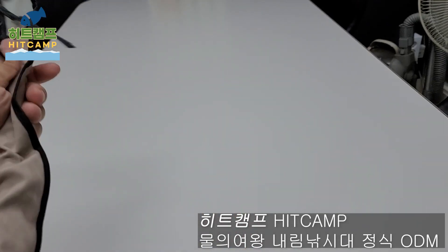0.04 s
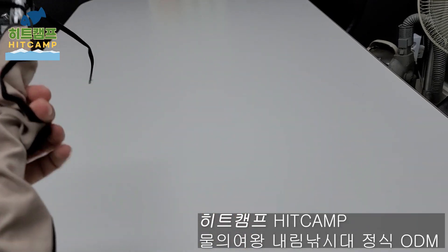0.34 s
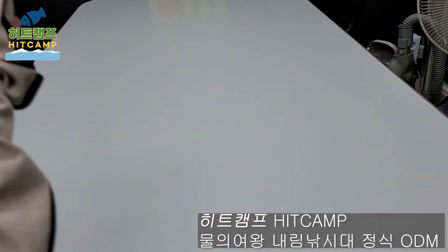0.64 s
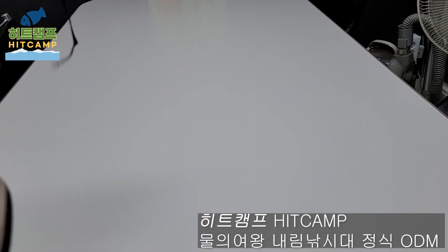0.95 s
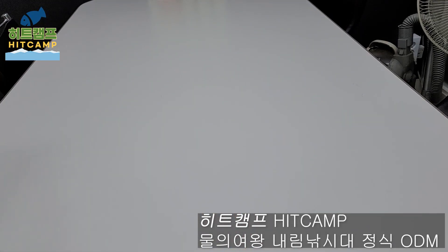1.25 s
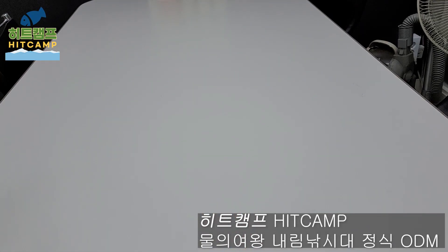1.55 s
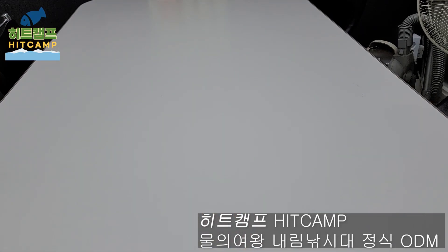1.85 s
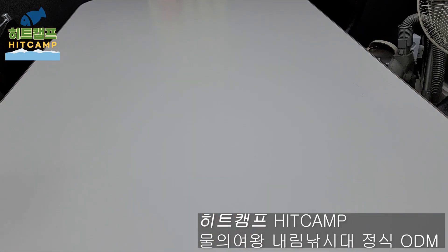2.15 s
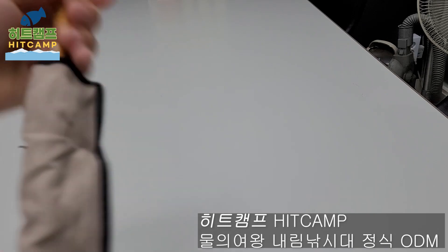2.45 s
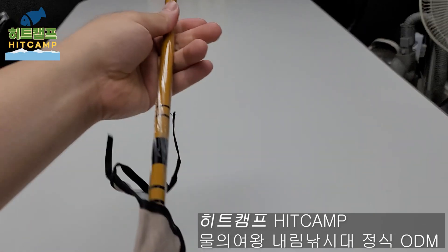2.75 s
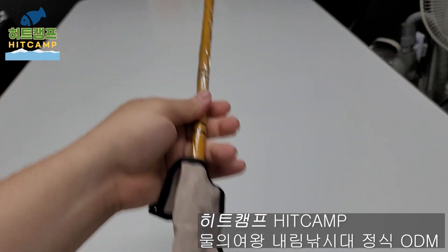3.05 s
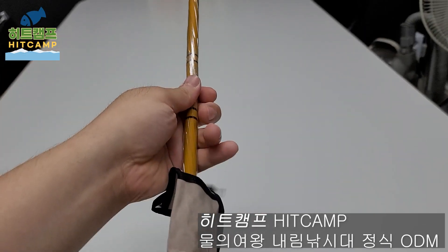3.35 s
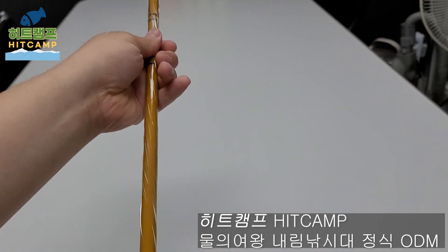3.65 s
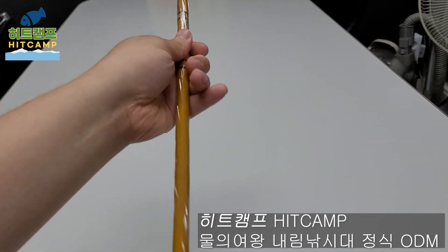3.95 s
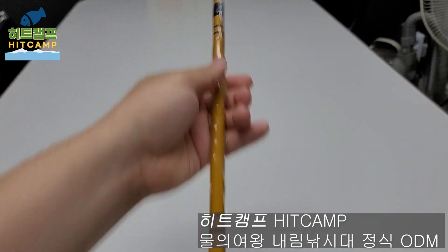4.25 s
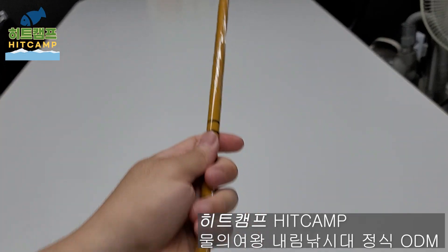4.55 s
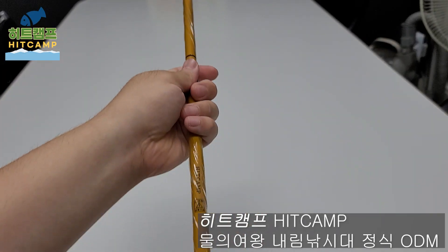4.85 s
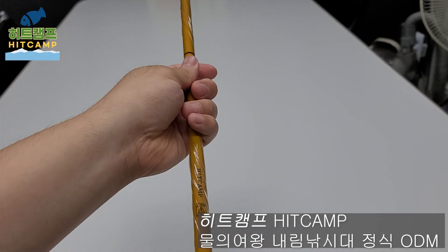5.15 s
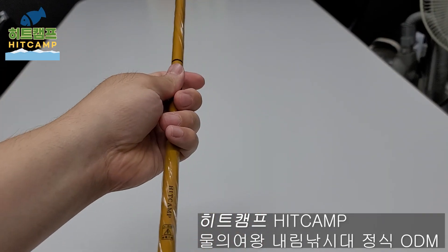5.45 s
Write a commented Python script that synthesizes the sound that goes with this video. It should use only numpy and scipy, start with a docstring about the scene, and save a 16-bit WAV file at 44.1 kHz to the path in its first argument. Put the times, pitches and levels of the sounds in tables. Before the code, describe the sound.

Cloth slides and crumples along a hollow fishing rod in short strokes, as sharp knocks and light ticks ring briefly indoors.

```python
"""Sharp, hollow clacks and ticks over sliding cloth: a fishing rod is drawn out of its sleeve
above a table in a small, bare room. Each knock briefly rings the rod's shell, damped by hand and
cloth. The sleeve hisses and crumples along it stroke by stroke, and the hand rubs, squeaks once
and bumps softly on the shaft. The walls ring for about half a second, over a faint steady noise."""
import sys
import numpy as np
from scipy import signal
from scipy.fft import rfft, irfft, next_fast_len
from scipy.io import wavfile
from scipy.ndimage import uniform_filter1d

SR = 44100
rng = np.random.default_rng(int(sys.argv[2]) if len(sys.argv) > 2 else 0)


def file_out(sig):
    """Save sig as 16-bit WAV at sys.argv[1]."""
    # one column per channel
    cols = np.atleast_2d(sig).T
    # limit, then scale
    lim = np.clip(cols, -1, 1)
    pcm = np.round(lim * 32767).astype(np.int16)
    wavfile.write(sys.argv[1], SR, pcm)


N = 246959
T = np.arange(N) / SR


def rod_knocks():
    """The rod clacks: the ear catches one lobe of its sound, the walls gather all directions."""
    # Blows on the rod. Each row: start in seconds, level in dB over 1 ms, favoured pitch in Hz,
    # its boost in dB, hardness in dB per octave, room send in dB.
    blows = [ (0.0650, -43, 700, 1, -7.5, 8.5), (0.115, -26.5, 1150, 10, -12, -7.5),
             (0.271, -31.5, 2320, 12, -3, 5.5), (0.3797, -34.5, 4160, 15, -8.5, -3.5),
             (0.4772, -45.5, 2020, 8.5, -3, 9.5), (0.525, -32.5, 4000, 10.5, -3, 2),
             (1.4395, -31.5, 5114, 13.5, -4.5, -5.5), (1.4428, -26.5, 4880, 9.5, 0, 9.5),
             (1.446, -26, 5220, 4, -0.5, 5), (1.7848, -7.5, 1910, 8.5, 0.5, 2),
             (1.7891, -11, 4263, 3, 1, 8.5), (2.1300, -43, 4460, 6.5, -3.5, 3.5),
             (2.3538, -43, 4310, 7, -5, 4), (2.5066, -40.5, 2000, 13, -8, 1.5),
             (2.5410, -34, 3916, 8.5, -4.5, 5), (2.6143, -11.5, 3500, 8, 0.5, -4.5),
             (2.6192, -12, 5000, 3, 0, 3.5), (2.8373, -27, 4267, 5.5, -2.5, 6.5),
             (2.8652, -13.5, 4700, 7.5, 3, -0.5), (2.8880, -25, 4700, 22, -7.5, 7),
             (3.032, -8.5, 2770, 6, 0.5, 0), (3.0438, -8, 5390, 8.5, -0.5, -2),
             (3.4232, -17, 3480, 10, -1.5, -2), (3.4571, -18.5, 3900, 5.5, -0.5, 0),
             (3.4860, -29, 2150, 37, 1, -14), (4.0356, -49, 3000, 5, -3.5, 12),
             (4.1837, -39, 2248, -0.5, -2.5, -25.5), (4.4824, -13.5, 3430, 5, 0.6, -4.5),
             (4.6428, -30.5, 7000, 14, 6, -9.5)]
    out = np.zeros(N)
    for start, db, pitch_hz, boost_db, hardness, room_db in blows:
        direct = clack(pitch_hz, boost_db, hardness, notch_db=-11, hollow=.45, lobes_db=3)
        around = clack(pitch_hz, boost_db, hardness, notch_db=-4, hollow=0, lobes_db=0)
        add(out, start, undb(db) * direct)
        # the rod moves, so each blow gets new echoes
        add(out, start, undb(db + room_db) * signal.fftconvolve(around, room()))
    return out


def clack(pitch_hz, boost_db, hardness, notch_db, hollow, lobes_db,
          notch_hz=4185, notch_width_hz=280, crack_db=-23, chatter_s=.0004, grain_hz=1100, bass_hz=330):
    """One blow on the hollow rod: the modes of its shell ring and die within a few milliseconds."""
    # Modes of the damped shell. Each row: centre in Hz, width in Hz, relative level in dB.
    modes = [(560, 430, -13.5), (965, 353, -8), (1690, 1200, -9), (2480, 380, -0.5), (3605, 3800, 2.5),
             (4540, 3300, -1), (5870, 2600, -1), (7500, 4200, -9), (10500, 21000, -11), (13910, 3000, -27)]
    size = 2048
    f = np.fft.rfftfreq(size, 1 / SR) + 1
    peaks = [undb(db) / (1 + (2 * (f - hz) / width) ** 2) for hz, width, db in modes]
    power = undb(crack_db) ** 2 + sum(peak ** 2 for peak in peaks)
    # hollow sets how far the main modes stand out
    shell = np.sqrt(power) * (power / uniform_filter1d(power, size // 12)) ** hollow
    # the place of contact favours some modes, a hard contact the high ones
    octaves_away = np.log2(np.maximum(f, modes[0][0]) / pitch_hz)
    gain_db = boost_db * np.exp(-.5 * (octaves_away / .22) ** 2) + hardness * octaves_away
    # between its two main modes the shell's motion cancels
    gain_db += notch_db * np.exp(-.5 * ((f - notch_hz) / notch_width_hz) ** 2)
    # the rod radiates in lobes, and little bass
    gain_db += lobes_db * np.interp(f / grain_hz, np.arange(size), rng.standard_normal(size))
    low_cut = (f / np.hypot(f, bass_hz)) ** 2
    log_gain = np.log(shell * undb(gain_db) * low_cut)
    # the ring comes after the blow
    causal_phase = rfft(irfft(log_gain) * 2 * (np.arange(size) < size // 2)).imag
    # the contact chatters, so the bands leave at slightly different moments
    lag_s = chatter_s * np.interp(f / grain_hz, np.arange(size), 2 * rng.random(size))
    # it stiffens as it closes, so the treble follows the lows
    lag_s += np.interp(f, [1500, 7000], [0, .0006])
    phase = causal_phase - 2 * np.pi * np.cumsum(lag_s) * SR / size
    blow = irfft(np.exp(log_gain + 1j * phase))
    return unit(blow) * np.sqrt(SR / 1000 / size)  # the energy of 1 ms at rms 1


def sleeve(hiss_trim_db=4, rub_trim_db=-1, flap_trim_db=-1):
    """Cloth hisses along the rod, skin and seams rub lower, folds flap dully; all follow the strokes."""
    # Strokes of hand and sleeve. Each row: start in seconds, length in seconds,
    # then the levels of hiss, rub and flap in dB before their trims.
    strokes = [ (0.0, .12, -63, -61.5, -54.5), (0.116, 0.15, -57, -52, -53.5), (0.257, .11, -54, -63, -53),
               (0.478, 0.11, -65.5, -67, -59), (0.64, 0.24, -75.5, -72.5, -68.5),
               (0.888, 0.46, -71, -69.5, -62.5), (1.121, 0.083, -59.5, -47, -49),
               (1.162, 0.095, -49, -53, -69), (1.231, .18, -55, -61.5, -70), (1.473, 0.1, -56.5, -53, -53),
               (1.527, 0.54, -56, -60.5, -75), (1.868, 0.087, -65.5, -48.5, -60),
               (2.154, 0.088, -58, -59, -61), (2.245, 0.093, -66, -55.5, -56),
               (2.388, 0.1, -68.5, -70, -73), (2.465, .08, -64, -56, -48), (2.578, 0.15, -56, -55, -48),
               (2.845, 0.067, -51.5, -48, -44), (2.948, 0.18, -59.5, -51.5, -46),
               (3.242, 0.31, -76, -58, -50), (3.342, 0.15, -58, -71, -62), (3.434, 0.23, -47, -53, -49.5),
               (3.70, 0.18, -81, -72.5, -56.5), (3.954, 0.087, -71.5, -77, -61),
               (4.035, 0.079, -60, -63, -62.5), (4.066, 0.077, -52, -59, -61),
               (4.152, 0.385, -69, -59, -59.5), (4.287, 0.057, -80, -47, -59),
               (4.503, 0.14, -50.5, -56, -56.5), (4.638, .05, -58.5, -48, -47.5),
               (4.82, 0.37, -93.5, -90, -70.5), (5.198, 0.052, -73.5, -75.5, -71),
               (5.28, 0.31, -83, -82.5, -72.5)]
    # Tone of the bright hiss, mid rub and low flap. Each row: frequency in Hz, relative level in dB.
    hiss_eq = [(500, -25.5), (1500, -0.5), (2800, 3), (4000, 4), (6200, 2.5), (8000, -5), (11000, -8),
               (15500, -10)]
    rub_eq = [(150, -14), (450, 0), (750, 1), (1500, -1), (2300, -9), (4000, -17), (6500, -21), (9000, -34),
              (16000, -42)]
    flap_eq = [(25, -16), (55, -1), (100, -3), (190, -1.5), (350, -5), (550, -7), (900, -22.5),
               (3000, -51.5)]
    power = sum(np.outer(undb(dbs), stroke_speed(start, length)) ** 2 for start, length, *dbs in strokes)
    hiss = friction(hiss_eq, snag_rate=1300, snag_db=-5, spread_db=3, jerk_db=1.5, jerk_hz=50, flick_db=1)
    rub = friction(rub_eq, snag_rate=300, snag_db=-4, spread_db=2.5,
                   jerk_db=1.5, jerk_hz=60, flick_db=1.3)
    flap = friction(flap_eq, snag_rate=80, snag_db=-5, spread_db=2, jerk_db=1.6, jerk_hz=35, flick_db=2)
    layers = [undb(hiss_trim_db) * hiss, undb(rub_trim_db) * rub, undb(flap_trim_db) * flap]
    return np.sum(np.sqrt(power) * layers, axis=0)


def stroke_speed(start, length, attack_s=0.016, release_s=0.0099):
    """The hand's speed, 0 to 1: it picks up, holds to the end of the stroke and comes to rest."""
    t = np.maximum(T - start, 0)
    return (1 - np.exp(-t / attack_s)) * np.exp(-np.maximum(t - length, 0) / release_s)


def friction(eq, snag_rate, snag_db, spread_db, jerk_db, jerk_hz, flick_db):
    """Countless fibres slip, a few snag and snap; the pull is jerky and bands flicker as folds shift."""
    snags = (rng.random(N) < snag_rate / SR) * rng.standard_normal(N)
    snags *= undb(spread_db * np.minimum(rng.exponential(size=N), np.pi))
    slips = rng.standard_normal(N) + undb(snag_db) * unit(snags)
    shifting = sum(band * undb(flick_db * wander(25)) for _, band in octaves(slips))
    return colour(shifting * undb(jerk_db * wander(jerk_hz)), eq)


def grip_squeak(start_s=1.705, length_s=0.029, db=-44, overtone_db=-11, roughness=.28):
    """The grip slips on the lacquer: a short, slightly rough, rising stick-slip tone."""
    n = int(length_s * SR)
    hz = np.linspace(2250, 3450, n) * (1 + roughness * rng.standard_normal(N)[:n])
    phase = 2 * np.pi * np.cumsum(hz) / SR
    tone = np.sin(phase) + undb(overtone_db) * (np.sin(2 * phase) + np.sin(3 * phase))
    out = np.zeros(N)
    add(out, start_s, undb(db) * unit(tone * np.hanning(n)))
    return out


def hand_bumps(push_s=0.00084, detune=0.014):
    """The soft hand pushes slowly on the shaft, so only the low modes answer."""
    # Soft bumps. Each row: start in seconds, gain in dB.
    bumps = [(0.526, -58.5), (0.687, -62), (1.188, -56), (1.547, -63), (1.788, -57.5), (2.472, -49.5),
             (2.528, -64), (3.477, -48), (4.850, -51), (4.936, -61.5), (5.519, -60.5)]
    # A bump's boom. Each row: pitch in Hz, seconds to fall 60 dB, relative level in dB.
    low_modes = [(58.5, 1, -3), (82, 0.2, 3), (131, 0.94, -4), (192, 0.34, -14), (234, 1, -11)]
    out, t = np.zeros(N), T[:SR]
    for start, db in bumps:
        boom = np.zeros(SR)
        for hz, t60, mode_db in low_modes:
            detuned_hz = hz * (1 + detune * rng.standard_normal())
            boom += undb(mode_db - 60 * t / t60) * np.sin(2 * np.pi * detuned_hz * t)
        add(out, start, undb(db) * boom * (1 - np.exp(-t / push_s)))
    return out


def room(build_s=0.0065, sparse_s=0.048, lumps_db=4, table_s=0.003, table_db=-13, size=32768):
    """Echoes of one click: a quick one off the table top, then wall echoes that thicken into a tail."""
    # The walls' ring. Each row: frequency in Hz, seconds to fall 60 dB, relative level in dB.
    ring = [(150, 0.54, -2), (400.8, 0.62, 5.5), (880, 0.73, 3), (2000, 0.48, 2.5), (5500, 0.47, -4.5),
            (9600, 0.56, 2.5), (15000, 0.36, 5)]
    decays = [(hz, t60) for hz, t60, _ in ring]
    levels = [(hz, db) for hz, _, db in ring]
    t = T[:size]
    # single echoes stand out early on, then blur together
    lumps = undb(lumps_db * np.exp(-t / sparse_s) * rng.standard_normal(size))
    echoes = rng.standard_normal(size) * lumps / np.sqrt(uniform_filter1d(lumps ** 2, SR // 200))
    tail = sum(band * undb(at_hz(levels, hz) - 60 * t / at_hz(decays, hz))
               for hz, band in octaves(echoes))
    tail = unit(tail * (1 - np.exp(-t / build_s))) / np.sqrt(size)
    add(tail, table_s, undb([table_db]))
    return tail


def room_tone(db=-70):
    """A faint, steady rumble with a trace of hiss."""
    # Tone of the quiet room. Each row: frequency in Hz, relative level in dB.
    air_eq = [(25, -1.5), (50, 4), (130, 4), (300, -6.5), (600, -22), (1200, -22.5), (2700, -28),
              (3600, -19), (5500, -16), (6700, -23.5), (7600, -30), (15000, -39)]
    return undb(db) * colour(rng.standard_normal(N), air_eq)


def undb(db):
    """Decibels to gain."""
    return 10 ** (np.asarray(db) / 20)


def unit(x):
    """Scale to rms 1."""
    return x / np.sqrt(np.mean(x ** 2))


def at_hz(points, hz):
    """Read (Hz, value) points on a log-frequency axis."""
    f, value = np.transpose(points)
    return np.interp(np.log(np.maximum(hz, 1)), np.log(f), value)


def colour(x, eq):
    """Shape a sound with a curve of (Hz, dB) points, at rms 1."""
    n = next_fast_len(len(x), True)
    gain = undb(at_hz(eq, np.fft.rfftfreq(n, 1 / SR)))
    return unit(irfft(rfft(x, n) * gain, n)[:len(x)])


def octaves(x, count=9):
    """Split into overlapping octave bands that sum to the whole: (Hz, band) pairs."""
    n = next_fast_len(len(x), True)
    centres = SR / 2 ** (np.arange(count, 0, -1) + .5)
    spectrum, f = rfft(x, n), np.fft.rfftfreq(n, 1 / SR)
    shares = [at_hz(np.c_[centres, row], f) for row in np.eye(count)]
    return [(hz, irfft(spectrum * share, n)[:len(x)]) for hz, share in zip(centres, shares)]


def wander(rate):
    """A random drift of spread near 1 that turns rate times a second."""
    steps = rng.standard_normal(N // 100)
    return np.interp(T * rate, np.arange(len(steps)), steps)


def add(track, start, sound):
    """Mix a sound into the track at start seconds."""
    i = max(int(start * SR), 0)
    track[i:i + len(sound)] += sound[:N - i]


def scene(room_send_db=-5):
    """Rod, sleeve and hand in the room, over its faint steady noise, in mono."""
    handling = sleeve() + grip_squeak()
    walls = signal.fftconvolve(undb(room_send_db) * handling, room())[:N]
    air = room_tone()
    return (rod_knocks() + handling + hand_bumps() + walls + air)[None]


def record(dry, top_hz=16000):
    """Clip the peaks at full scale and cut the highest treble steeply."""
    low_pass = signal.ellip(10, .2, 80, top_hz, fs=SR, output="sos")
    return signal.sosfilt(low_pass, np.clip(dry, -1, 1))


dry = scene()
out = record(dry)
file_out(out)
```